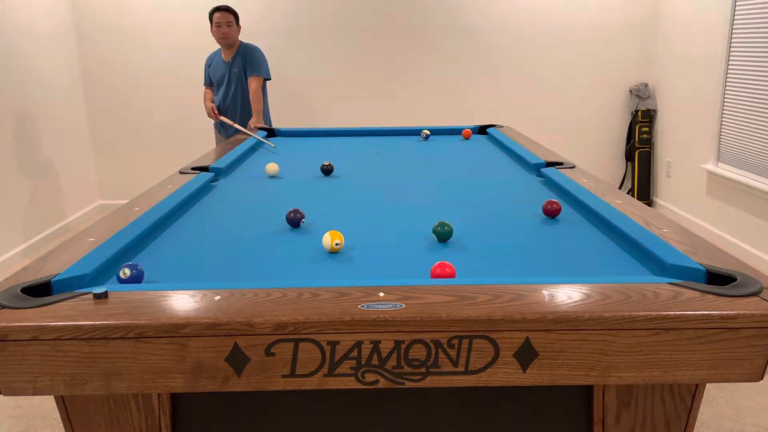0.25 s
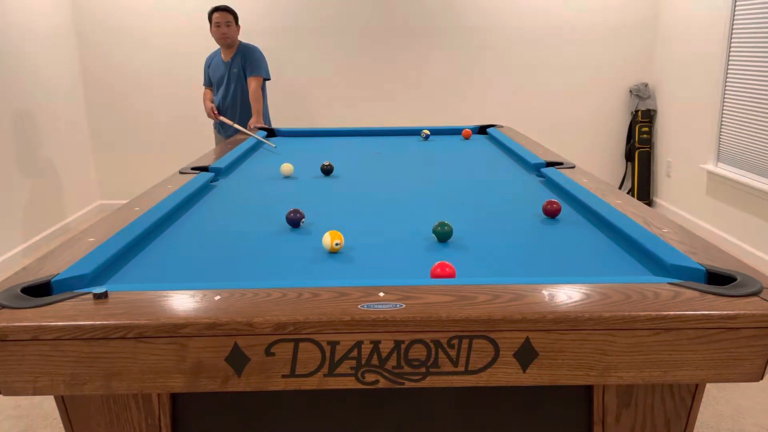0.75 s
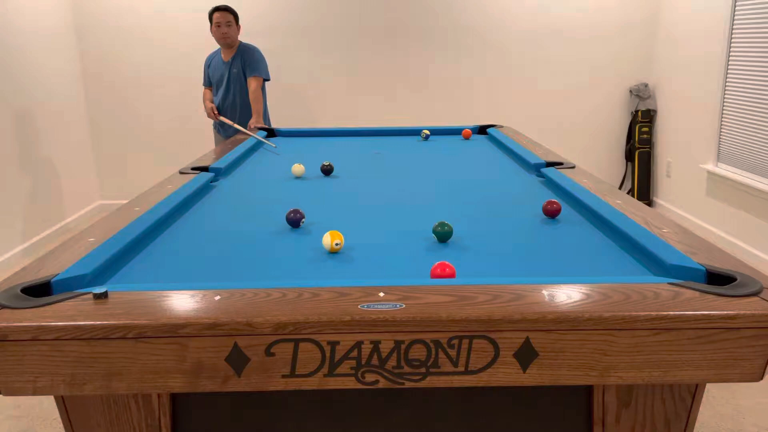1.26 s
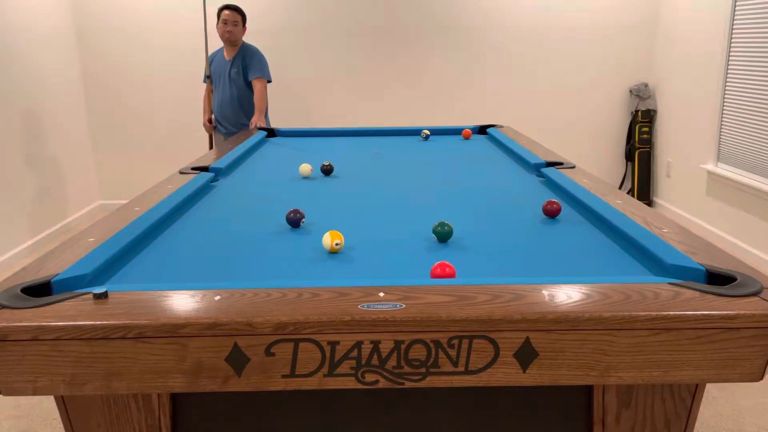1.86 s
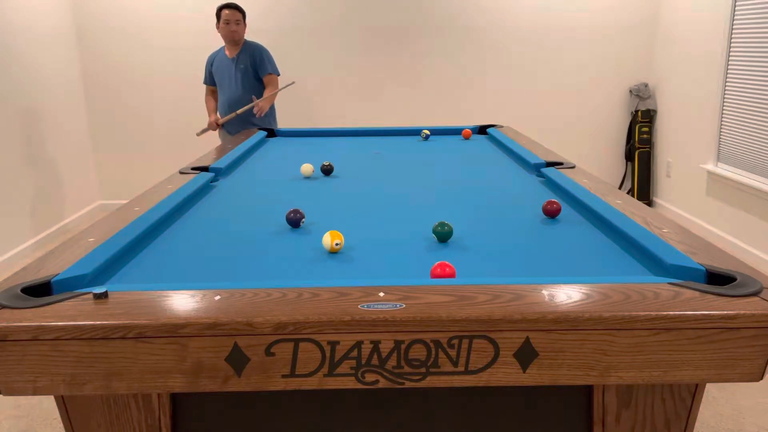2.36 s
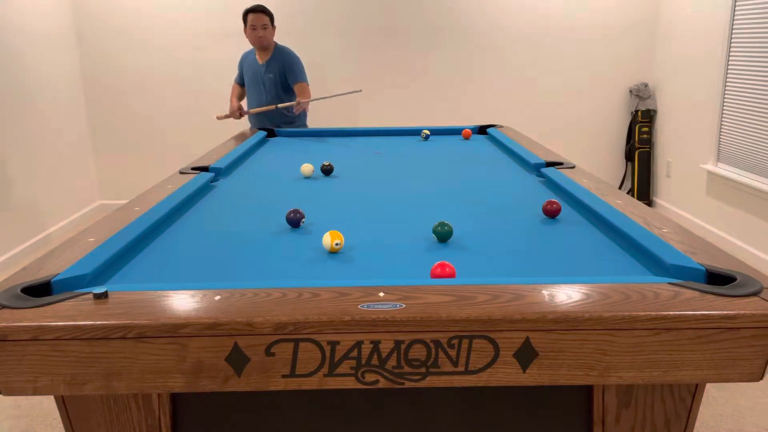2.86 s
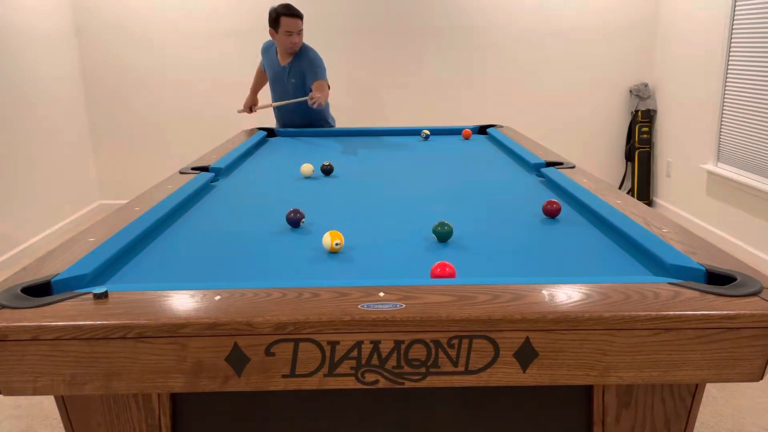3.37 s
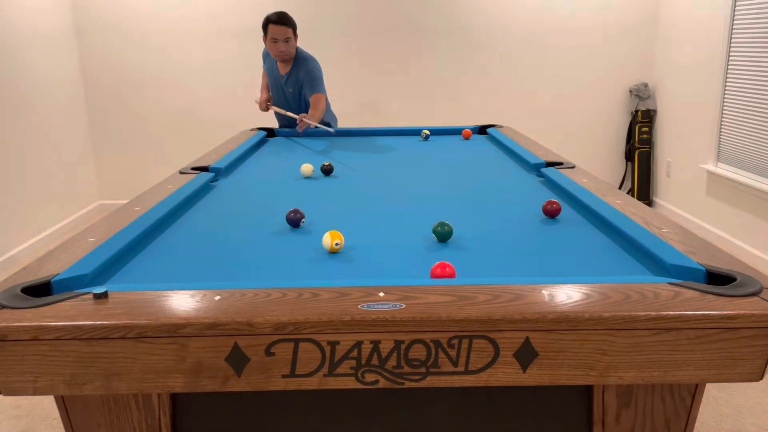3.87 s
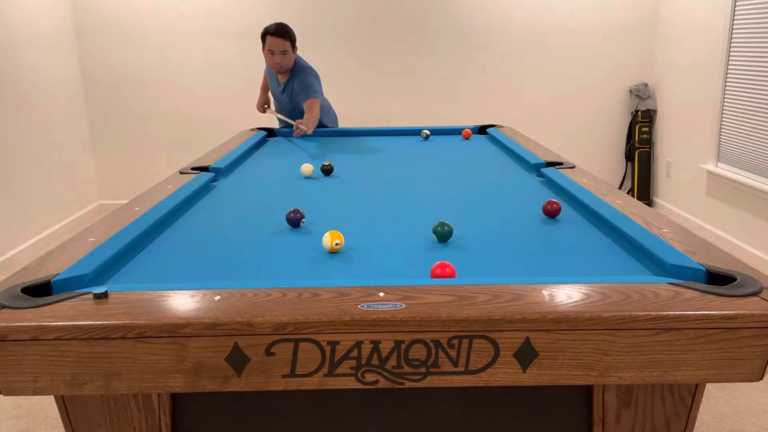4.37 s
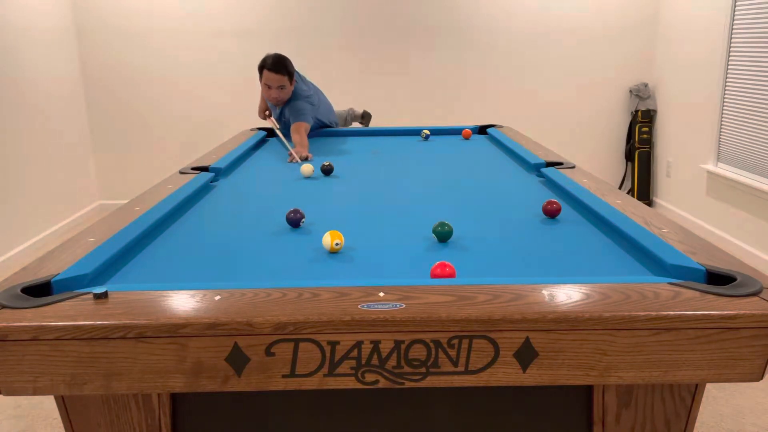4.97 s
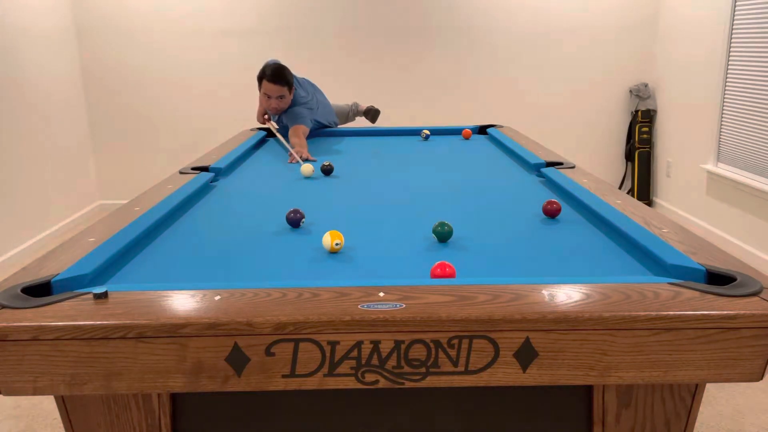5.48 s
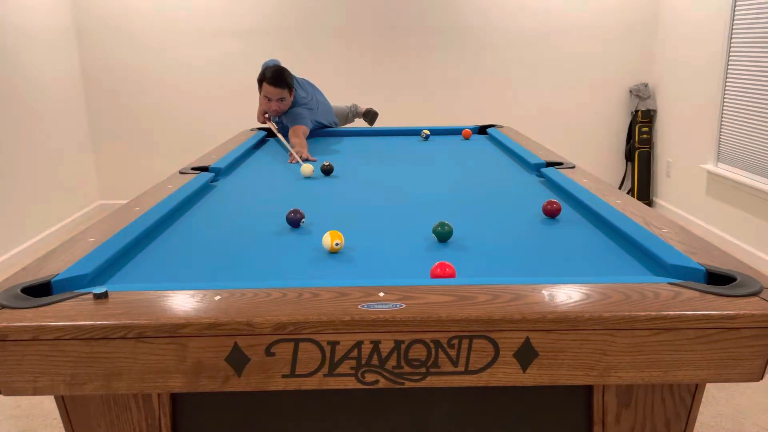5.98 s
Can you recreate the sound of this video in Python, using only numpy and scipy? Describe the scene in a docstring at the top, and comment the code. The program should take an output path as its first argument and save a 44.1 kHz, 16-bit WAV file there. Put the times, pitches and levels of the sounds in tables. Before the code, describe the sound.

A bare room hums low. A pool ball drops into a corner pocket and rattles down the hollow chute inside a heavy table, gritty and woody for about a second. It rolls on as a deep, lumpy rumble while duller knocks land in the tray, some loud. Faint clothing rustles far off. After a near-silent pause, a heavy low thud shakes the cabinet. Close stereo microphones, short room ring.

```python
"""A bare, quiet room hums low: shaped noise. At 0.7 s a pool ball drops into a corner pocket of a slate table
and rattles down the hollow return chute: brief noise bursts and contacts excite resonances of table and ball.
It rolls on until 3.9 s as lumpy noise through the table's modes; duller knocks, some of them loud, follow from
2.4 s in the tray, while the player's clothes rustle far off as filtered noise; at 5.6 s a heavy thud shakes the
cabinet. Solid blows leave decaying sine modes; the room rings for over half a second as a diffuse noise tail."""
import sys
import numpy as np
from scipy import signal
from scipy.fft import rfft, irfft, next_fast_len
from scipy.io import wavfile
from scipy.ndimage import map_coordinates

SR = 44100
rng = np.random.default_rng(int(sys.argv[2]) if len(sys.argv) > 2 else 0)


def nominal_scale(level):
    """Amplitude ratio for a level in decibels (scalar or array-like)."""
    x = np.asarray(level, float) / 20
    return 10 ** x


def digitize_waveform(pressure):
    """Quantize a signal to 16-bit integers and store it at the path in sys.argv[1].

    Rows of a 2-D input are taken as channels; values are limited to [-1, 1].
    """
    field = np.atleast_2d(pressure).T
    bounded = np.clip(field, -1, 1)
    quanta = np.round(bounded * 32767).astype(np.int16)
    wavfile.write(sys.argv[1], SR, quanta)


N = 274743


def unit(x):
    """Normalisation: x scaled to rms 1."""
    return x / np.sqrt(np.mean(x ** 2) + 1e-20)


def along(points, hz):
    """Logarithmic frequency scale: (f/Hz, value) points interpolated on it."""
    f, v = np.transpose(points)
    return np.interp(np.log(hz + 1), np.log(f + 1), v)


def curves(rows):
    """Linear envelopes: one value per sample for each column after the time."""
    s, *cols = np.transpose(rows)
    return [np.interp(np.arange(N) / SR, s, c) for c in cols]


def wobble(rate):
    """Slow random modulation: a smooth curve with rate knots a second."""
    knots = rng.standard_normal(int(N * rate / SR) + 4)
    return map_coordinates(knots, [np.arange(N) * rate / SR])


def filtered(x, response):
    """Linear filtering: the spectrum of x times a response of frequency."""
    m = next_fast_len(x.shape[-1] + 8192)
    spectrum = rfft(x, m) * response(np.fft.rfftfreq(m, 1 / SR))
    return irfft(spectrum, m)[..., :x.shape[-1]]


def ringing(modes, scatter_db=0):
    """Modal superposition: damped resonators in alternating sign, their gains scattered at random."""
    gains = nominal_scale(scatter_db * rng.standard_normal(len(modes)))

    def response(f):
        total = 0
        for k, (centre, width, db) in enumerate(modes):
            resonance = 1j * f * width / (centre * centre - f * f + 1j * f * width)
            total = total + (-1) ** k * gains[k] * nominal_scale(db) * resonance
        return total

    return response


def dull(corner_hz, order):
    """Causal low-pass: a soft contact lasts longer and loses treble."""
    return lambda f: (1 + 1j * f / corner_hz) ** -order


def add(into, x, start):
    """Linear superposition of x on a longer pair of signals."""
    part = into[:, start:start + x.shape[1]]
    part += x[:, :part.shape[1]]


# background spectrum, shape only: f/Hz, density/dB per Hz
HUM = [(15, -36), (25, -5), (64, 0.5), (152, -10), (215, -17), (253, -17), (399, -25), (495, -31.5),
       (826, -34.5), (945, -38.5), (7500, -51.5), (13500, -51), (15500, -56.5)]
# drift of the low rumble: t/s, change/dB
HUM_DRIFT = [(0.1, -3), (0.7, -3), (3.7, -3), (4.3, -1), (4.55, 4.5), (5.2, 4.5), (6.2, 6)]


def hum():
    """Shaped noise: the house's low rumble wavers and swells late on, the hiss above it is steady."""
    level_db = -59.5
    noise = unit(filtered(rng.standard_normal((2, N)), lambda hz: nominal_scale(along(HUM, hz))))
    low = filtered(noise, lambda hz: 1 / (1 + (hz / 450) ** 4))
    waver = nominal_scale(curves(HUM_DRIFT)[0] + 2.1 * wobble(23))
    return nominal_scale(level_db) * (waver * low + noise - low)


# reverberation time of the late decay: f/Hz, t60/s
ROOM = [(70, 1), (250, 0.6), (1000, 0.64), (3000, 0.49), (6000, 0.42), (12000, 0.23)]


def room(x, direct_db):
    """Statistical reverberation: direct sound and a fresh diffuse tail, each frequency dying at its own speed."""
    early_db, early_s = 6, .04  # near walls and table answer first and die sooner
    build_up_s = 0.0016
    hz, t, z = signal.stft(rng.standard_normal((2, SR * 3 // 4)), SR, nperseg=256)
    z = z * nominal_scale(-60 * t / along(ROOM, hz)[:, None])
    z = z * nominal_scale(early_db * np.exp(-t / early_s))
    z = z / np.linalg.norm(z, axis=2, keepdims=True)  # equal energy at every frequency
    tail = signal.istft(z, SR, nperseg=256)[1]
    build_up = 1 - np.exp(-np.arange(tail.shape[1]) / SR / build_up_s)
    tail = tail / np.linalg.norm(tail[0]) * build_up
    # the direct sound reaches the two microphones unevenly
    tail[0, 0] += nominal_scale(direct_db)
    tail[1, round(.0003 * SR)] -= nominal_scale(direct_db - 12.5)
    return signal.fftconvolve(x[None], tail, axes=1)


# resonances of each part of table and ball: f/Hz, width/Hz, level/dB
DEEP = [(51, 7.1, -9.5), (64, 19, -4.5), (81, 7.9, 2)]  # legs and floor
BOOM = [(94.4, 28, -1.5), (119.5, 17, -2.5), (144, 29, -7)]
CABINET = [(181, 69, -5.5), (226, 36, -2), (266.4, 15, 2.5), (309, 50, -4)]
APRON = [(362.6, 60, -1), (400.2, 45, -2.5), (436.8, 24, -3.5), (516, 21, -7.5)]
PANEL = [(591, 70, 1.5), (763, 98, 0), (880, 140, -7)]
CHUTE = [(944, 190, -0.32), (1076, 260, -0.069)]
FRAME = [(1233, 170, -1), (1430, 200, -7), (1530, 110, -9)]
RAIL = [(1735, 250, -3.5), (2090, 330, 1), (2246, 620, -5)]
CLACK = [(2300, 350, -1), (2900, 470, 4.5), (3660, 410, 3)]
BALL = [(4220, 460, 1.5), (5240, 900, 0), (4100, 590, -5)]
# ball rolling on slowly inside the table, felt as deep boom: t/s, level/dB
ROLL = [(0.7, -69), (0.9, -54.5), (1.04, -43), (1.2, -41), (1.45, -37), (1.85, -46), (2.07, -40),
        (2.5, -40), (2.78, -35), (2.93, -58.5), (3.08, -35), (3.18, -48), (3.3, -88), (3.49, -37),
        (3.69, -65), (3.9, -71)]
# ball running down the chute: t/s, level/dB
RUN = [(0.75, -86.5), (0.88, -45), (1.04, -42), (1.16, -24.5), (1.26, -39), (1.41, -29.5), (1.52, -33),
       (1.74, -30), (1.85, -47.5), (2.07, -89.5)]
# grit of the run, relative to its rumble: t/s, level/dB
GRIT = [(0.75, -7), (1.1, -4), (1.25, -11), (1.32, -4.5), (1.45, -2), (1.57, -6.5), (1.7, -7.5),
        (1.85, -9.5), (2.07, -14)]


def rolling():
    """Roughness excitation: uneven contact makes lumpy noise that drives cabinet and panels in the room."""
    lumps = nominal_scale(1.0 * wobble(30) + 0.44 * wobble(7.1)) * rng.standard_normal((3, N))
    lumps[2] *= nominal_scale(2.2 * wobble(90))  # the grit chatters in small fast bumps

    def ring(x, modes, top_hz):
        return unit(filtered(filtered(x, ringing(modes)), dull(top_hz, order=3)))

    grit = ring(lumps[2], PANEL + CHUTE + FRAME, 1700)
    grit = grit + nominal_scale(-17) * ring(lumps[2], RAIL, 3500)
    grit = grit + nominal_scale(-19.0) * ring(lumps[2], CLACK + BALL, 4800)
    rumble = ring(lumps[0], CABINET + APRON, 650)
    boom = ring(lumps[1], DEEP + BOOM, 640)
    run = nominal_scale(curves(RUN)[0]) * (rumble + nominal_scale(curves(GRIT)[0]) * grit)
    roll = nominal_scale(curves(ROLL)[0]) * (boom + nominal_scale(-21.5) * rumble + nominal_scale(-45) * grit)
    dry = run + roll
    first, last = round(ROLL[0][0] * SR), round(ROLL[-1][0] * SR)
    out, step = np.zeros((2, N)), SR // 4
    for start in range(first, last - step, step):  # the ball moves on: new echoes, cross-faded
        piece = dry[start:start + 2 * step] * np.hanning(2 * step)
        add(out, room(piece, direct_db=-15.0), start)
    return out


# bright snap of a contact: f/Hz, width/Hz, level/dB
SNAP = [(6400, 690, 1.5), (8300, 990, -3.5), (11000, 1200, -7.5)]


def strike(row, tone):
    """Impact excitation: a contact and a short rattle ring eleven parts; big ones swell slower, rattle longer."""
    _, db, apron_db, panel_db, chute_db, rail_db, clack_db = row
    boom_db, deep_db, frame_db, ball_db, snap_db, sharp, longer, slower = tone
    t = np.arange(SR // 4) / SR
    # modes, level/dB, rattle/s and rise/s (both scaled below), low-pass corner/Hz
    parts = [(DEEP, deep_db, .04, .015, 300),
             (FRAME, chute_db + frame_db, .018, .0012, 2500),
             (BALL, clack_db + ball_db, .008, .0005, 9000),
             (BOOM, boom_db, .045, .012, 400),
             (CABINET, 0, .028, .002, 800),
             (APRON, apron_db, .024, .002, 900),
             (PANEL, panel_db, .022, .0015, 1500),
             (RAIL, rail_db, .015, .001, 3500),
             (CHUTE, chute_db, .018, .0012, 2000),
             (CLACK, clack_db, .014, .0008, 5500),
             (SNAP, clack_db + snap_db, .01, .0006, 14000)]
    soft = slower * nominal_scale(-.25 * (clack_db + 24.0))  # a dull blow is a soft contact: it swells slower
    dry = 0
    for modes, part_db, rattle_s, rise_s, top_hz in parts:
        swell = (1 - np.exp(-t / (rise_s * soft))) ** 2
        shake = swell * np.exp(-t / (rattle_s * longer)) * rng.standard_normal(len(t))
        # the first contact, clearer on hard blows
        shake[round(rise_s * soft * SR)] += sharp / soft * np.linalg.norm(shake)
        ring = filtered(filtered(shake, ringing(modes, scatter_db=-1.5)), dull(top_hz, order=3))
        dry = dry + nominal_scale(part_db) * ring / np.linalg.norm(ring)
    energy = np.sqrt(0.012 * SR)  # the cabinet part holds the energy of 12 ms at the blow's level
    return nominal_scale(db) * energy * dry


# Blows: t/s, cabinet level/dB, then relative to the cabinet:
# apron level/dB, panel level/dB, chute level/dB, rail level/dB, clack level/dB
RATTLE = [(0.706, -30.5, 7, -1, -7.5, -19, -24), (0.713, -33.5, -4, -8, -6, -8.5, -14.5),
          (0.86, -34, -6.5, -8.5, -9.5, -17.5, -28), (0.981, -21.5, 4, -4, -2.5, -14, -11.5),
          (1.039, -22, -5.5, -15.5, -13, -12.5, -18), (1.077, -25, -8, -9, -9, -15.5, -18.5),
          (1.264, -37, -7.5, 2, 1.5, -19.5, -22.5), (1.291, -29, 3.5, 4, -1, -12, -24),
          (1.34, -31.5, -12, -8, -11.5, -16, -21), (1.371, -26, -1.5, -12.5, -5, -18, -20.5),
          (1.419, -30.5, -8, -13.5, -9, -30, -24), (1.445, -33.5, -5, -12, 4, -20.5, -20),
          (1.489, -24.5, 0.5, -8.5, -7, -21, -27), (1.548, -35.5, -7.5, -12.5, -0.5, -26, -30),
          (1.622, -26.5, 1.5, 2.5, -10.5, -13.5, -22.5), (1.661, -35, -5, -9, 2.5, -17.5, -27),
          (1.681, -25, 3.5, -14.5, -14, -27, -26), (1.75, -25.5, 3.5, -7, -31, -30, -29),
          (1.784, -28, -8, -0.5, -1.5, -12.5, -18.5), (1.87, -22.5, 1, -3.5, -33, -32.5, -44),
          (1.889, -24.5, -12, -14.5, -26.5, -40.5, -46.5)]  # the ball in pocket and chute
KNOCKS = [(2.43, -29, 6, -11, -17.5, -24.5, -42.5), (2.45, -18, -11, -18, -33.5, -38.5, -50),
          (2.681, -32.5, 6.5, 1, -12.5, -20.5, -36.5), (2.711, -28, 2.5, -5, -29.5, -26, -40),
          (2.818, -41.5, -4, -13, -16, -10, -12.5), (2.998, -26, 8, -3, -5.5, -17.5, -24),
          (3.028, -22, 1, -2, -14, -27, -36.5), (3.11, -42.5, -1, 2.5, -33, -28.5, -34),
          (3.474, -43.5, 10, 8.5, -20.5, -23, -43.5), (3.505, -38, 0, -8.5, -22, -42, -47.5),
          (3.706, -57, -5, -11, -22, -23, -48), (4.64, -41.5, 5, -8.5, -23.5, -51, -45)]  # duller, deep in the table
THUD = [(5.642, -34, -2.5, -7, -8, -25, -30.5), (5.652, -19, -0.5, -4, -4, -18.5, -22.5),
        (5.664, -21, -2.5, -3, -3.5, -10.5, -14), (5.678, -20.5, -8, -1, -6, -13, -12.5),
        (5.712, -18, -3, -11.5, -20.5, -25.5, -24), (5.745, -17, -3.5, -21, -25, -31.5, -30)]  # the heavy thud lands in six contacts
# Tone of each kind of blow: boom over cabinet/dB, deep thump over cabinet/dB, frame over chute/dB,
# ball ring over clack/dB, bright snap over clack/dB, sharpness of the first contact (0-1),
# rattle length (multiple), swell time (multiple)
RATTLE_TONE = (-6, -15.5, -7, -4, -8.5, 0.93, 1.5, 1.2)
KNOCK_TONE = (-6, -13, 0, -6.5, -16, 0.28, 0.41, 1.09)
THUD_TONE = (-2.5, -7, -3, -9.5, -24.5, 0.34, 0.33, 3)


def blows():
    """Superposed impacts: each blow excites the table's modes and is heard through the room."""
    out = np.zeros((2, N))
    for rows, tone in [(RATTLE, RATTLE_TONE), (KNOCKS, KNOCK_TONE), (THUD, THUD_TONE)]:
        for row in rows:
            start = round((row[0] - .002) * SR)  # contact starts just before the knock peaks
            add(out, room(strike(row, tone), direct_db=-2.5), start)
    return out


# longest-ringing modes, one list a part (legs, bed, cabinet, apron, frame): f/Hz, level/dB, t60/s
MODES_RUNG = [
    [(65.8, -5, .55), (85.8, 0, .55)],
    [(120, -3, .45), (150, 0, .55), (190, -3, .45)],
    [(269.5, 0, .5), (294, -9, .3)],
    [(360, 0, .45), (522, -5, .4), (617, -10, .35)],
    [(868, -3, .3), (968, -2, .3), (1100, -5, .3), (1245, 0, .3)],
]
# swell time of each part, longer for big ones: swell/s
SWELL_S = [0.043, 0.02, .012, .007, 0.0054]
# blows solid enough to leave a clear ring:
# t/s, legs level/dB, bed level/dB, cabinet level/dB, apron level/dB, frame level/dB
SOLID = [(0.708, -57.5, -46.5, -40.5, -35.5, -46.5), (0.981, -45.5, -33.5, -21, -29, -50),
         (1.041, -48, -38.5, -31, -35.5, -34), (1.292, -32.5, -40.5, -20.5, -40, -33.5),
         (1.399, -39, -39.5, -33, -46.5, -45.5), (1.659, -47, -38, -40, -25, -48),
         (1.784, -45.5, -41, -27, -34, -46), (1.89, -42, -27.5, -26, -39, -45),
         (2.432, -42.5, -21, -26, -34, -50.5), (2.685, -51, -41, -38.5, -38.5, -66),
         (2.713, -41.5, -38, -38.5, -36.5, -56.5), (3.0, -36.5, -28.5, -42, -19.5, -34.5),
         (3.475, -43.5, -41.5, -54.5, -37, -63), (4.643, -46, -48, -56, -40.5, -70),
         (5.652, -15, -19.5, -13.5, -35.5, -33)]


def clear_ring():
    """Free modal decay: sine tones of the table swell and fade after solid blows, at slightly random levels."""
    out, t = np.zeros((2, N)), np.arange(SR * 3 // 4) / SR
    for s, *levels_db in SOLID:
        ring = 0
        for modes, db, swell_s in zip(MODES_RUNG, levels_db, SWELL_S):
            swell = (1 - np.exp(-t / swell_s)) ** 2
            for hz, mode_db, t60 in modes:
                level_db = db + mode_db + 1.5 * rng.standard_normal() - 60 * t / t60
                ring = ring + nominal_scale(level_db) * swell * np.sin(2 * np.pi * hz * t)
        # the second signal is weaker and 60 samples late
        add(out, np.array([ring, 0.4 * np.roll(ring, 60)]), round(s * SR))
    return out


# spectrum of the hiss, shape only: f/Hz, density/dB per Hz
CLOTH = [(2650, -38), (4500, -5.5), (5590, -13.5), (5980, -2), (7130, -5.5), (7590, -9.5), (13500, -8),
         (14900, -11), (15500, -20.5)]
# resonance of the swish: f/Hz, width/Hz, level/dB
SWISH = [(3000, 14000, 0)]
# clothes moving: t/s, hiss level/dB
RUSTLE = [(2.35, -100), (2.58, -91.5), (2.74, -63.5), (2.83, -73.5), (3.0, -68.5), (3.37, -78), (3.52, -94),
          (3.66, -84.5), (4.06, -93), (4.16, -100), (4.27, -83.5), (4.42, -99), (4.49, -80.5), (4.8, -72),
          (5.14, -86.5), (5.3, -103), (5.4, -113)]


def rustle():
    """Friction noise: thin, smooth hiss of cloth sliding on cloth, and a lower swish along the rail."""
    noise = nominal_scale(.7 * wobble(25)) * rng.standard_normal((2, 2, N))
    hiss = unit(filtered(noise[0], lambda hz: nominal_scale(along(CLOTH, hz))))
    swish = unit(filtered(filtered(noise[1], ringing(SWISH)), dull(3600, order=2)))
    swish_over_hiss_db = 1
    return nominal_scale(curves(RUSTLE)[0]) * (hiss + nominal_scale(swish_over_hiss_db) * swish)


# left-right likeness: f/Hz, correlation (-1 to 1)
ALIKE = [(60, 0.95), (105, 0.94), (150, 0.77), (330, 0.56), (600, -0.46), (2000, -0.15), (5000, 0.023),
         (9000, -0.24), (11000, -0.4), (12500, 0.98)]
# left over right: f/Hz, level/dB
LEAN = [(100, -1.5), (400, 0.5), (1500, 1), (5000, 4.5), (12000, 0.5)]


def pair(two):
    """Interchannel coherence: two signals become mid and side, weighted to set likeness at each frequency."""
    def mid_side(hz):
        turn = np.arccos(np.clip(along(ALIKE, hz), -1, 1)) / 2
        return np.array([np.cos(turn), np.sin(turn)])

    mid, side = filtered(two, mid_side)
    left_right = np.array([mid + side, mid - side])
    return filtered(left_right, lambda hz: nominal_scale(np.outer([.5, -.5], along(LEAN, hz))))


def scene():
    """Superposition: every source reaches two close microphones."""
    return pair(hum() + rolling() + blows() + clear_ring() + rustle())


def band_limit(x):
    """A steep low-pass at the top of the band."""
    return signal.sosfilt(signal.butter(12, 15950, fs=SR, output="sos"), x)


def record(dry):
    """Band limitation: the microphones lose the deepest bass, the recorder drops the highest treble."""
    bass_hz, top_hz = 33.8, 14900

    def band(hz):
        high_pass = (1 - dull(bass_hz, order=1)(hz)) ** 3
        return high_pass / (1 + (hz / top_hz) ** 40)

    return band_limit(filtered(dry, band))


dry = scene()
out = record(dry)
digitize_waveform(out)
```